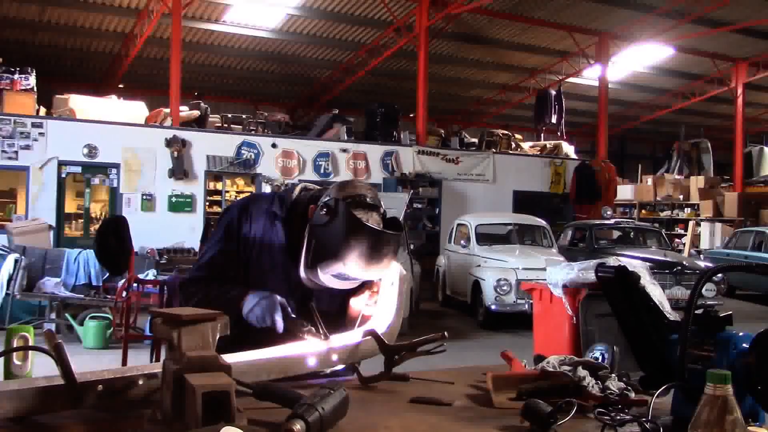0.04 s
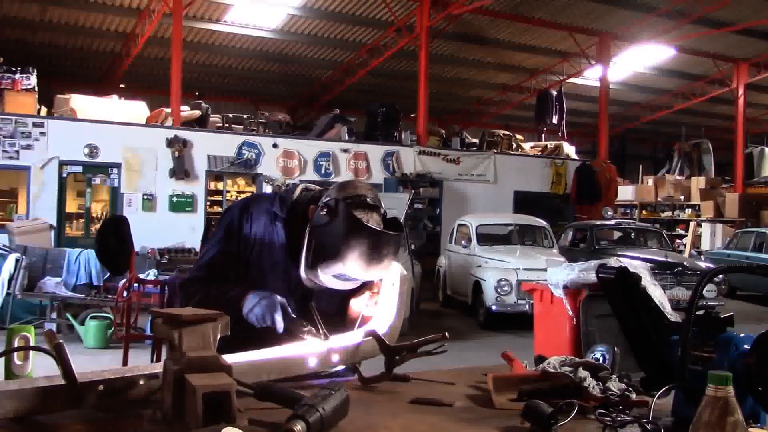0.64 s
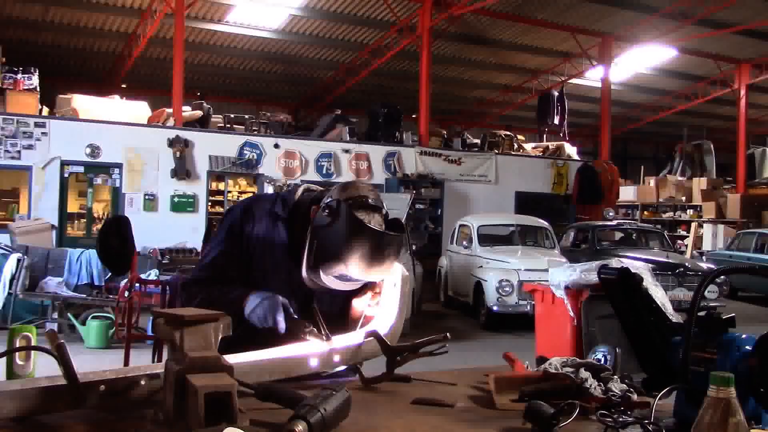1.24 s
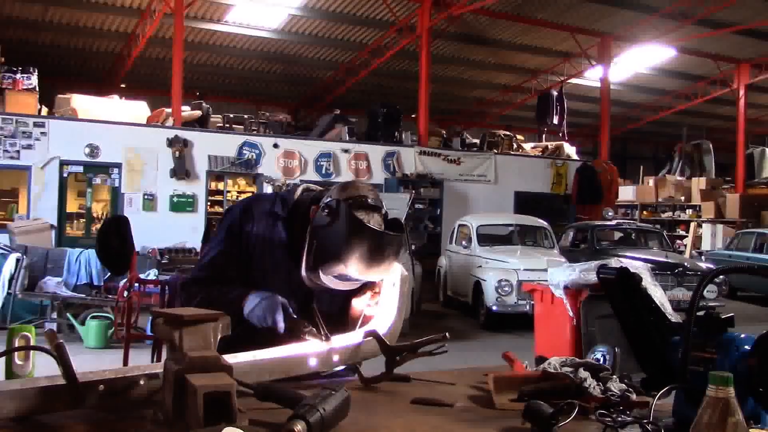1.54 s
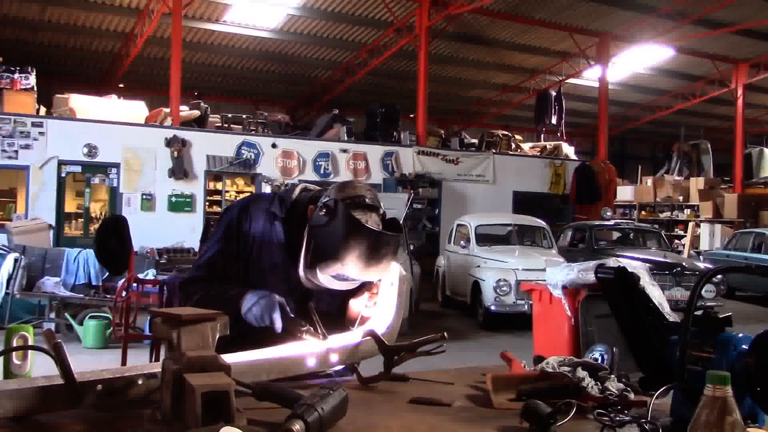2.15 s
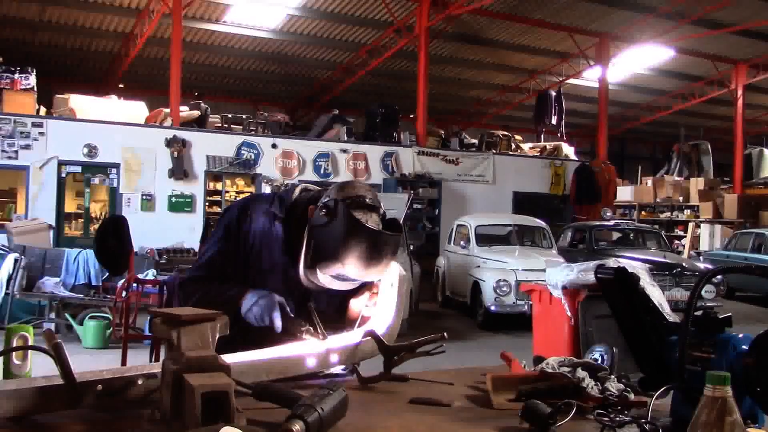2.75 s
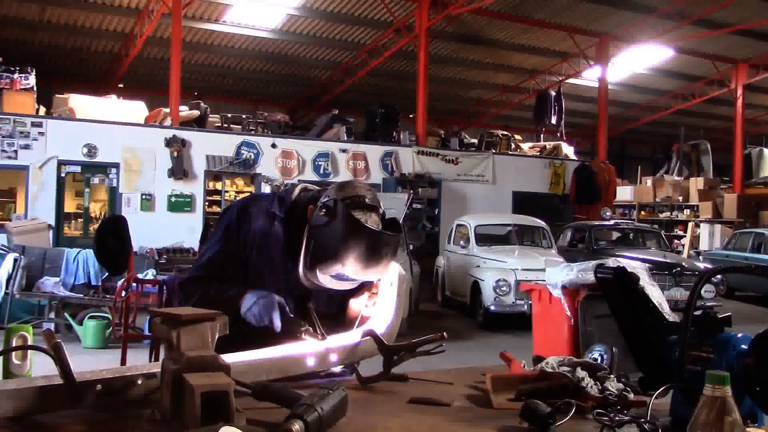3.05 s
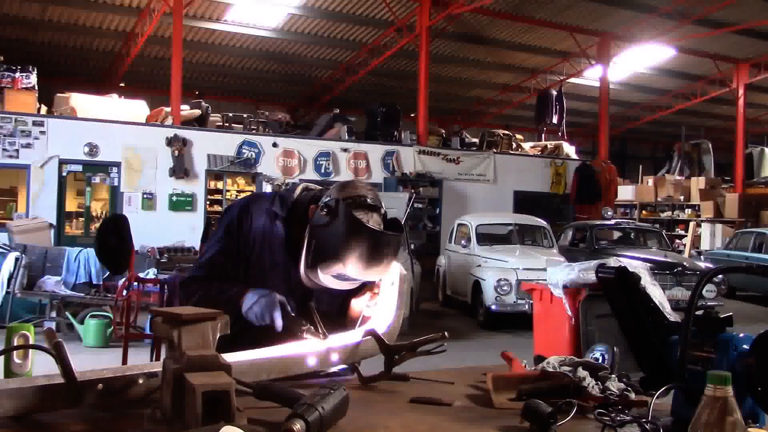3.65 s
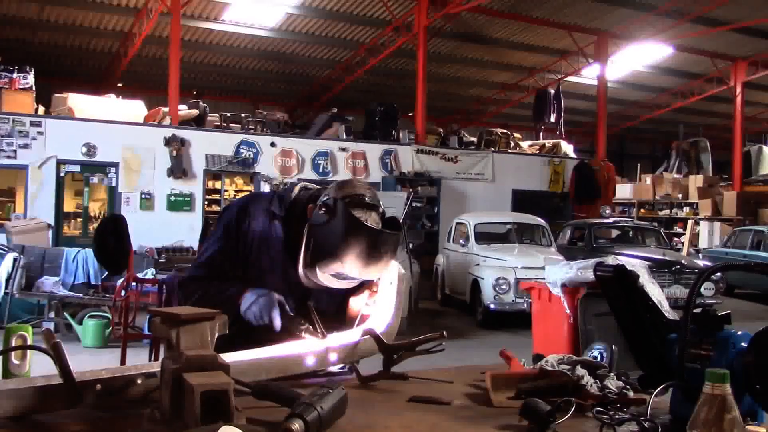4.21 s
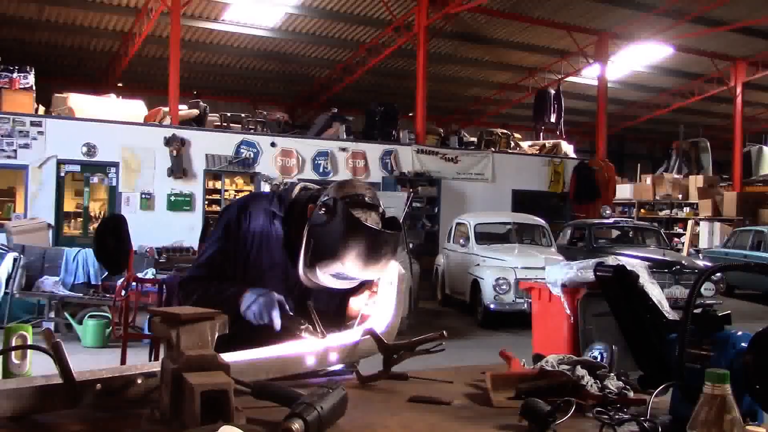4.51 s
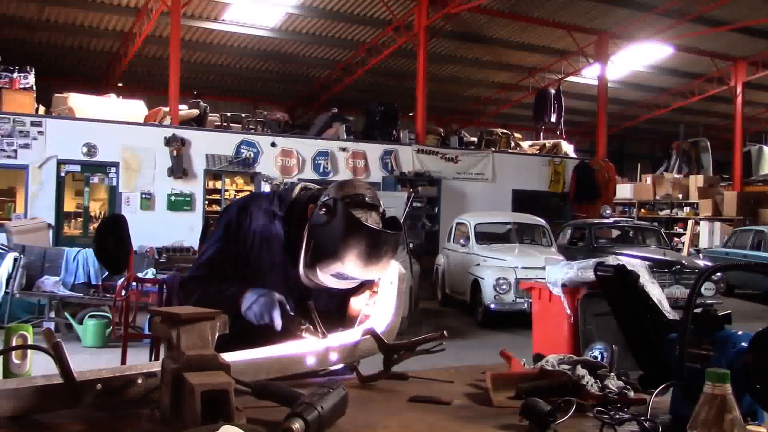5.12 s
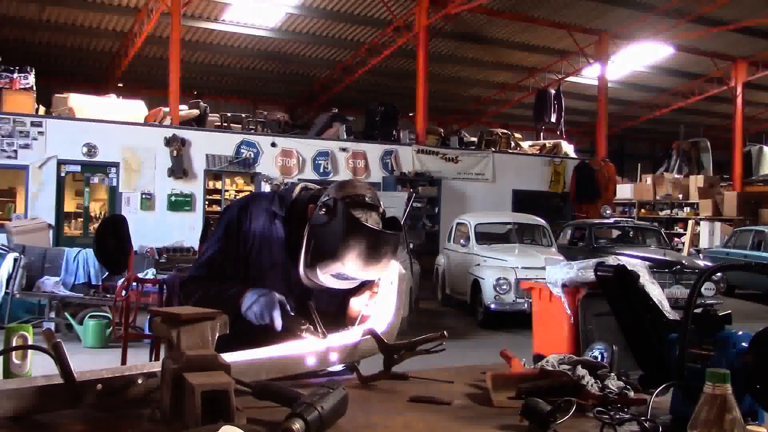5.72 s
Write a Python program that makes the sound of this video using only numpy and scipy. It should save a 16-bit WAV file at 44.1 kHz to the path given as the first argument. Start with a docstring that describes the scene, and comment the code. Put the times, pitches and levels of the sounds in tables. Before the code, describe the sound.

An electric welding arc buzzes steadily up close, with a sharp sizzling crackle and a soft hiss of gas.

```python
"""An AC TIG arc buzzes on a metal part on a workshop bench, close to a pair of microphones.
The current reverses twice a cycle and the arc snaps each time; in the short cleaning half-wave between
the two snaps it sizzles on the oxide, while the hot shielding gas flutters, hisses and faintly whistles.
Bench and tools throw the sound back, and the hall adds a thin tail. The power source's hum and a low
rumble lie far underneath. Everything stops dead near the end."""
import sys
import numpy as np
from scipy import signal
from scipy.fft import rfft, irfft, next_fast_len
from scipy.io import wavfile

SR = 44100
rng = np.random.default_rng(int(sys.argv[2]) if len(sys.argv) > 2 else 0)


def dump(signal):
    """Clip the signal to [-1, 1] and save it as 16-bit WAV at the path in sys.argv[1]."""
    limited = np.clip(np.atleast_2d(signal).T, -1, 1)
    pcm = np.round(limited * 32767).astype(np.int16)
    wavfile.write(sys.argv[1], SR, pcm)


N = 263277

CYCLE_HZ, FIRST_STRIKE_S, STOP_S = 56.33, .01472, 5.762
CLEANING_S, RELIGHT_S, AFTERGLOW_S = .004812, .0004, .0011  # half-wave length; flare and glow decay
SIZZLE_DB, FLUTTER_DB, PUFF_DB, HISS_DB, WHISTLE_DB = -22.5, -33, -30.5, -32, -39.5  # calm, at the torch
ATTACK_S, RELEASE_S = 0.033, 0.043  # of every swell
TOP_HZ = 14550

# low background rumble: f/Hz, relative level/dB
RUMBLE_SPECTRUM = [(25, -7.5), (120, -4.5), (400, -5.0), (2000, -45.0)]
# decay of the hall, floored at 0.05 s in hall(): f/Hz, t60/s
HALL_DECAY = [(150, 1.54), (2000, -0.1), (12000, 1.9)]
# colour of the hall's tail: f/Hz, level/dB
HALL_SPECTRUM = [(150, -9), (1000, -13.5), (4200, -11), (7000, -10), (12000, -21)]
# faint noise, opposite in left and right, that slightly widens the buzz: f/Hz, relative level/dB
WIDTH_NOISE_SPECTRUM = [(30, -6), (120, -10), (300, -7), (800, -12), (1900, -17), (2250, -9), (2490, 4),
                        (2800, -5), (4000, 1), (5000, 3), (6200, -2), (7500, 0), (12500, 2), (14300, 1)]
# left microphone against the right, negative where it lags: f/Hz, phase/rad
LEFT_PHASE = [(100, 0), (1900, -.04), (2400, -.18), (3300, -.26), (4400, -.52), (8000, -.93),
              (10600, -1.42), (13800, -1.85)]
# close reflections off bench, vice and visor: delay/ms, gain
BENCH_ECHOES = [(0.563, -0.15), (0.682, -0.13), (0.956, -0.13), (1.15, -0.14), (1.394, -0.17),
                (1.619, 0.055), (2.035, 0.047)]
# peaks and hollows of torch cup and workpiece: f/Hz, width/Hz, level/dB
BODY_RESONANCES = [(1457.7, 31, 4), (1634, 99, 4), (1844, 99, 3.5), (2496, 160, 4), (3060, 81, 0.5),
                   (3997, 69, 3), (4391, 273, 6.5), (5180, 110, 1), (5526, 140, 6.5), (7380, 130, 5.5),
                   (10570, 500, 9.5), (11050, 256, -9.5), (11540, 210, 6), (12500, 190, 3)]
# main ring of the workpiece as the torch moves: t/s, level/dB
RING_LEVEL = [(0, 3), (.3, 1.2), (1.15, 2.6), (1.33, -1.5), (1.6, 1.3), (1.95, -.5), (2.22, 2),
              (2.65, -1.5), (3, .5), (3.2, -2.3), (3.45, 1.5), (5.76, .6)]
# top treble as the torch moves: t/s, level/dB
TREBLE_LEVEL = [(0, -7), (.35, -1.5), (1.1, -5), (1.22, 1), (3.4, 2.5), (4.5, -2), (5.76, 0)]
# crossover into that top treble: f/Hz, gain
TREBLE_BAND = [(10700, 0), (11300, 1)]
# resonances of the gas jet: f/Hz, width/Hz, relative level/dB
JET_MODES = [(3900, 330, -1.5), (4670, 190, -7), (4800, 540, -2.5)]
# the jet's whistle swells: t/s, length/s, rise/dB
WHISTLE_SWELLS = [(-.04, 0.28, 9), (1.2, 0.77, 8), (3.05, .37, 9)]
# puff of heated gas: f/Hz, relative level/dB
PUFF_SPECTRUM = [(200, -20), (520, -16.5), (780, 2.5), (1100, 2.5), (1500, -6), (2500, -21.5)]
# flutter of the flow: f/Hz, relative level/dB
FLUTTER_SPECTRUM = [(20, -20), (40, -10.5), (80, -16.5), (130, -8.5), (200, -3.5), (290, 1), (400, -2.5),
                    (550, -12), (1000, -17), (3000, -45)]
# steady gas hiss: f/Hz, relative level/dB
HISS_SPECTRUM = [(300, -8), (800, 5), (1900, 2.5), (3000, -1), (4600, -1), (6200, -2), (8000, -11.5),
                 (10600, -3), (14200, -1.5)]
# slow unrest of the hot gas, driving flutter and puffs: t/s, level/dB
GAS_UNREST = [(0, 1.5), (.33, -2.5), (.72, 2), (1.3, 1), (1.9, -3.5), (2.5, 0.1), (3.3, -2.2), (4.1, -1.2),
              (4.7, 0.5), (5.25, -2.5), (5.76, -0.5)]
# brief gas surges: t/s, length/s, flutter level/dB, puff level/dB
GAS_SURGES = [(-.04, 0.087, 1, 3.5), (.86, 0.059, -0.5, 4.5), (2.73, 0.11, 4.5, 3.5), (3.41, 0.067, 4.5, 3),
              (3.76, 0.16, 4.5, 6.5), (4.345, .09, -0.5, 6.5), (4.5, 0.13, -1, 2.5)]
# sizzle on the oxide: f/Hz, relative level/dB
SIZZLE_SPECTRUM = [(300, -25.5), (900, -12.5), (1900, -2.5), (3000, 3), (4800, 0.5), (6200, -6.5),
                   (8000, -2), (9200, 0.5), (10600, 0.5), (12600, -1.5), (14200, -21.5)]
# the arc crosses dirtier (+) or cleaner (-) metal: t/s, length/s, sizzle level/dB
OXIDE_PATCHES = [(.03, 0.17, 1), (1.17, 0.043, 6), (1.44, .27, 3), (2.24, 0.13, 2), (2.6, 0.22, -1),
                 (2.98, 0.79, 1), (3.75, 0.42, 2), (5.2, 0.15, -4)]
# specks of oxide burst: t/s, level/dB
OXIDE_SPITS = [(1.5763, -6), (1.6835, -16)]
# snap of the relighting arc: f/Hz, relative level/dB
SNAP_SPECTRUM = [(56, -5.5), (280, -10.5), (520, -16), (800, -2), (1050, 0.5), (1900, -1.5), (3100, 3),
                 (4800, -3), (6200, -8.5), (8000, -5), (9200, -14.5), (10600, -1.5), (12600, 2),
                 (14200, -16)]


def amp(db):
    """Decibels to gain."""
    return 10 ** (np.asarray(db) / 20)


def unit(x):
    """Scale to rms 1."""
    return x / np.sqrt(np.mean(x ** 2) + 1e-20)


def along(points, hz):
    """Read (f/Hz, value) points on a log frequency axis."""
    f, values = np.transpose(points)
    return np.interp(np.log(hz + 1), np.log(f + 1), values)


def curve(points):
    """Read (t/s, value) points at every sample."""
    times, values = np.transpose(points)
    return np.interp(np.arange(N) / SR, times, values)


def swells(rows):
    """Attack, hold and release for each (t/s, length/s, level/dB, ..) row; a dB track per level column."""
    t = np.arange(N) / SR
    rows = np.array(rows)
    shapes = [np.clip((t - start) / ATTACK_S, 0, 1) * np.clip(1 - (t - start - length) / RELEASE_S, 0, 1)
              for start, length in rows[:, :2]]
    return rows[:, 2:].T @ np.array(shapes)


def filtered(x, response):
    """Pass x through a complex frequency response."""
    size = 2 * next_fast_len(N // 2 + SR // 4)
    hz = np.fft.rfftfreq(size, 1 / SR)
    return irfft(rfft(x, size) * response(hz), size)[..., :N]


def minimum_phase(db):
    """The causal response with these levels."""
    cepstrum = irfft(np.log(amp(db)))
    half = len(cepstrum) // 2
    cepstrum[1:half] *= 2
    cepstrum[half + 1:] = 0
    return np.exp(rfft(cepstrum))


def pulses(times, sizes):
    """Impulses placed between samples as windowed sincs."""
    at = times[:, None] * SR
    taps = np.floor(at).astype(int) + np.arange(-7, 9)
    shape = np.sinc(taps - at) * np.cos(np.pi * (taps - at) / 16) ** 2
    inside = (taps >= 0) & (taps < N)
    return np.bincount(taps[inside], (sizes[:, None] * shape)[inside], N)


def cleaning(scatter_db, relight_db, rest_db):
    """Envelope of the cleaning half-waves: relight flare, plateau, afterglow; a new strength each cycle."""
    cycle, phase = np.divmod((np.arange(N) / SR - FIRST_STRIKE_S) * CYCLE_HZ + 1, 1)
    age = phase / CYCLE_HZ
    strengths = amp(scatter_db * rng.standard_normal(int(cycle[-1]) + 1))
    flare = amp(relight_db) * np.exp(-age / RELIGHT_S)
    plateau = np.exp(-np.maximum(age - CLEANING_S, 0) / AFTERGLOW_S)
    return strengths[cycle.astype(int)] * (plateau + flare) + amp(rest_db)


def rumble(level_db):
    """A faint, steady rumble, the same at both microphones."""
    noise = rng.standard_normal(N)
    return amp(level_db) * unit(filtered(noise, lambda hz: amp(along(RUMBLE_SPECTRUM, hz))))


def hum(level_db):
    """The power source hums at twice the cycle rate."""
    return amp(level_db) * unit(np.sin(4 * np.pi * CYCLE_HZ * np.arange(N) / SR))


def hall(x):
    """The hall around the bench returns a thin, diffuse tail, shortest near 2 kHz."""
    hz, t, noise = signal.stft(rng.standard_normal(SR // 2), SR, nperseg=256)
    t60_s = np.maximum(along(HALL_DECAY, hz), .05)
    decay = amp(-60 * t / t60_s[:, None])
    decay /= np.sqrt(np.mean(decay ** 2, axis=1, keepdims=True))
    colour = amp(along(HALL_SPECTRUM, hz))[:, None]
    tail = signal.istft(noise * decay * colour, SR, nperseg=256)[1]
    return signal.fftconvolve(x, tail / np.sqrt(len(tail)))[:N]


def width_noise():
    """A faint noise pulsing with the buzz, opposite in left and right; rms 1."""
    noise = rng.standard_normal(N) * cleaning(scatter_db=1, relight_db=-8, rest_db=-14)
    return unit(filtered(noise, lambda hz: amp(along(WIDTH_NOISE_SPECTRUM, hz))))


def from_torch(x, spectrum, ringing=1):
    """Colour a sound at the arc, ring it in cup and workpiece, add the close reflections; rms 1."""
    def response(hz):
        body_db = sum(db / (1 + (2 * (hz - centre) / width) ** 2) for centre, width, db in BODY_RESONANCES)
        bench = 1 + sum(gain * np.exp(-2j * np.pi * hz * ms / 1000) for ms, gain in BENCH_ECHOES)
        return minimum_phase(along(spectrum, hz) + ringing * body_db) * bench
    return unit(filtered(x, response))


def torch_movement(x, ring_hz, width_hz):
    """Moving the torch changes how strongly the workpiece rings and how much top treble gets out."""
    treble = filtered(x, lambda hz: along(TREBLE_BAND, hz))
    ring = filtered(x, lambda hz: np.exp(-((hz - ring_hz) / width_hz) ** 2))
    return x + (amp(curve(TREBLE_LEVEL)) - 1) * treble + (amp(curve(RING_LEVEL)) - 1) * ring


def jet_whistle():
    """The gas jet sings faintly in a few resonances, swelling now and then."""
    def modes(hz):
        return sum((-1) ** k * amp(db) * 1j * hz * width / (centre ** 2 - hz ** 2 + 1j * hz * width)
                   for k, (centre, width, db) in enumerate(JET_MODES))
    whistle = unit(filtered(rng.standard_normal(N), modes))
    return amp(WHISTLE_DB + swells(WHISTLE_SWELLS)[0]) * whistle


def shielding_gas():
    """Each cleaning half-wave heats the gas into a puff; the flow flutters and hisses throughout."""
    flutter_db, puff_db = curve(GAS_UNREST) + swells(GAS_SURGES)
    puff, flutter, hiss = rng.standard_normal((3, N))
    puff *= cleaning(scatter_db=0.5, relight_db=-5, rest_db=-14)
    puff = amp(PUFF_DB + puff_db) * from_torch(puff, PUFF_SPECTRUM)
    flutter *= cleaning(scatter_db=4.0, relight_db=6, rest_db=5.5)
    flutter = unit(filtered(flutter, lambda hz: minimum_phase(along(FLUTTER_SPECTRUM, hz))))
    hiss = amp(HISS_DB) * from_torch(hiss, HISS_SPECTRUM)
    return puff + amp(FLUTTER_DB + flutter_db) * flutter + hiss


def oxide_sizzle(grain_db, spit_s):
    """Arc spots hop over the oxide in tiny cracks; now and then a speck bursts."""
    cracks = unit(rng.standard_normal(N) * amp(grain_db * rng.standard_normal(N)))
    half_waves = unit(cleaning(scatter_db=1.2, relight_db=-1, rest_db=-18))
    envelope = amp(SIZZLE_DB + swells(OXIDE_PATCHES)[0]) * half_waves
    t = np.arange(N) / SR
    for start, db in OXIDE_SPITS:
        envelope += amp(db) * (t >= start) * np.exp(-np.abs(t - start) / spit_s)
    rms = np.sqrt(np.mean(envelope ** 2))
    return rms * from_torch(envelope * cracks, SIZZLE_SPECTRUM)


def arc_snaps(strike_scatter_db, return_scatter_db, return_db, level_db, smear_hz, jitter_s):
    """The arc relights at each current reversal: two pressure pulses a cycle, the first less punctual."""
    strikes = FIRST_STRIKE_S + np.arange(-1, N / SR * CYCLE_HZ) / CYCLE_HZ
    strike_draw, return_draw, timing_draw = rng.standard_normal((len(strikes), 3)).T
    train = pulses(strikes + jitter_s * timing_draw, amp(strike_scatter_db * strike_draw))
    train += pulses(strikes + CLEANING_S, amp(return_db + return_scatter_db * return_draw))
    # the highs of each snap trail its lows a little, which blunts the peak
    train = filtered(train, lambda hz: np.exp(-1j * (hz / smear_hz) ** 2))
    return amp(level_db) * from_torch(train, SNAP_SPECTRUM, ringing=1.3)


def scene():
    """Two microphones close to the bench; arc and hall reach the right one slightly sooner."""
    arc = arc_snaps(strike_scatter_db=2.0, return_scatter_db=2.3, return_db=0.5,
                    level_db=-16.5, smear_hz=11000, jitter_s=6e-6)
    arc = arc + oxide_sizzle(grain_db=5, spit_s=.0015) + shielding_gas()
    arc = torch_movement(arc, ring_hz=2520, width_hz=260) + jet_whistle()
    sides = np.array([[.5], [-.5]])  # left, right
    pair = filtered(arc + hall(arc), lambda hz: np.exp(1j * sides * along(LEFT_PHASE, hz)))
    width = sides * amp(-30) * width_noise()  # opposite in left and right, slightly widening the buzz
    return pair + width + rumble(level_db=-53.0) + hum(level_db=-56.5)


def record(dry):
    """Behind the microphones the tallest snaps saturate, the sound stops dead and the band is limited."""
    def band(hz):
        low_cut = hz / (hz - 12j)  # first order, 12 Hz
        return low_cut / np.sqrt(1 + (hz / TOP_HZ) ** 120)
    saturated = dry / (1 + np.abs(dry / .95) ** 6) ** (1 / 6)
    running = np.arange(N) / SR < STOP_S
    return filtered(saturated * running, band)


dry = scene()
out = record(dry)
dump(out)
```